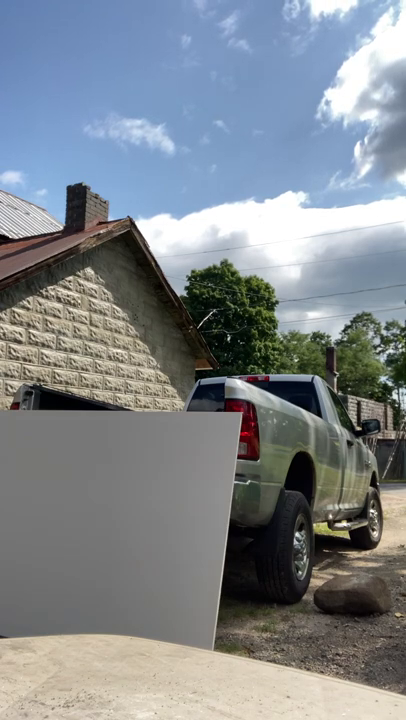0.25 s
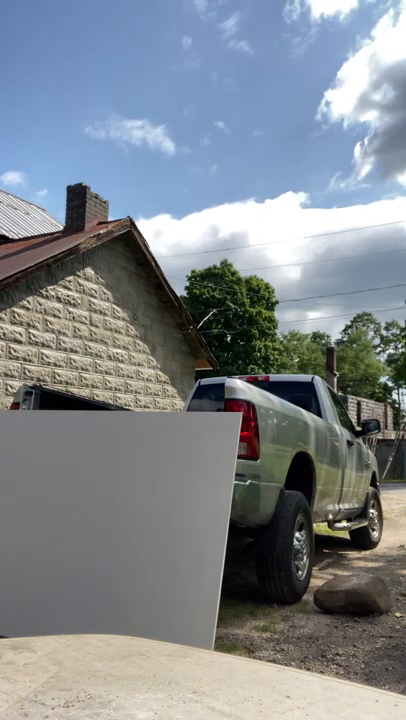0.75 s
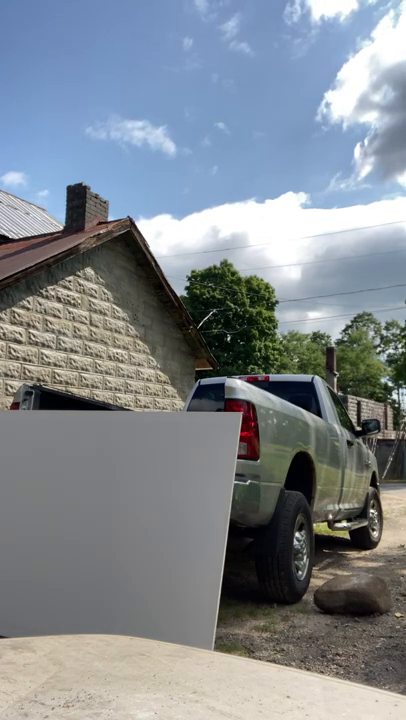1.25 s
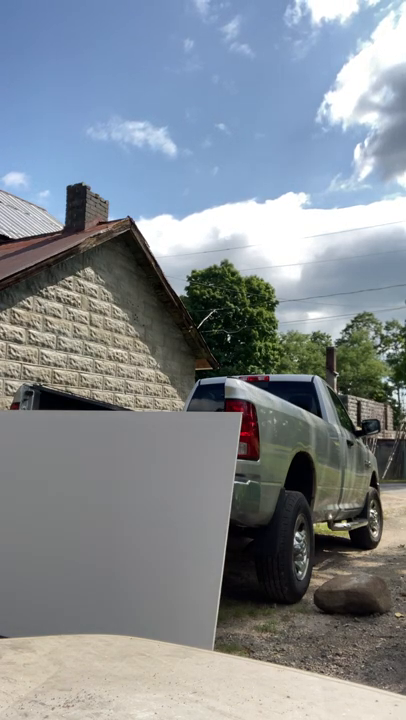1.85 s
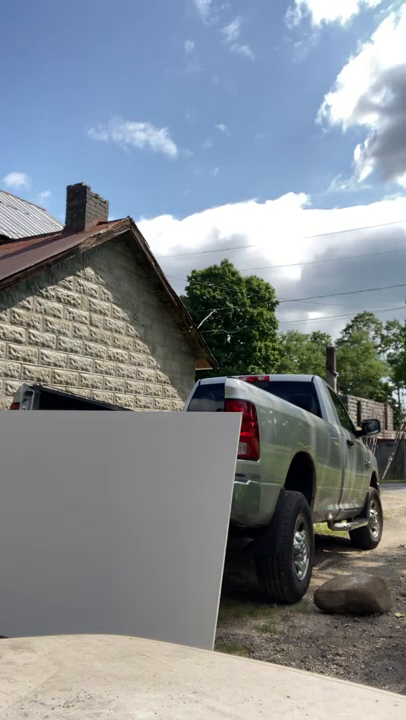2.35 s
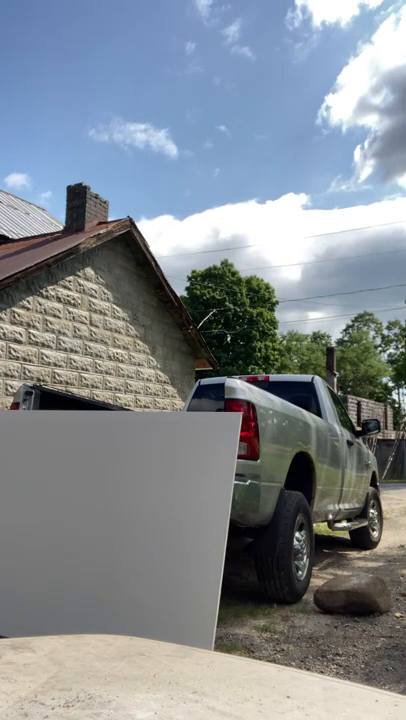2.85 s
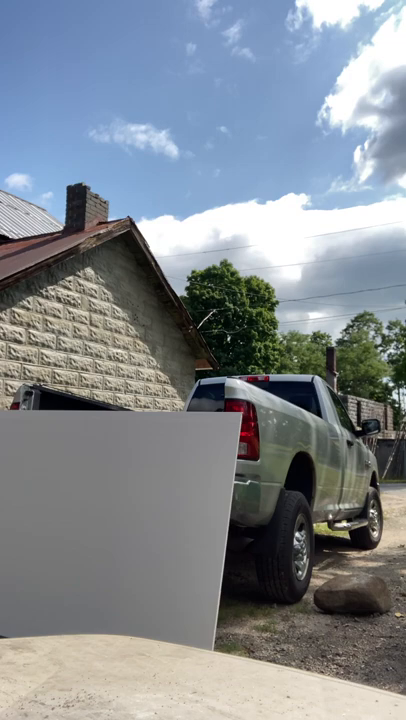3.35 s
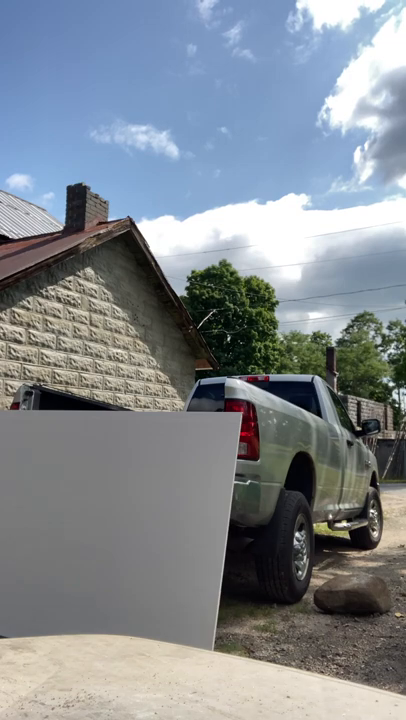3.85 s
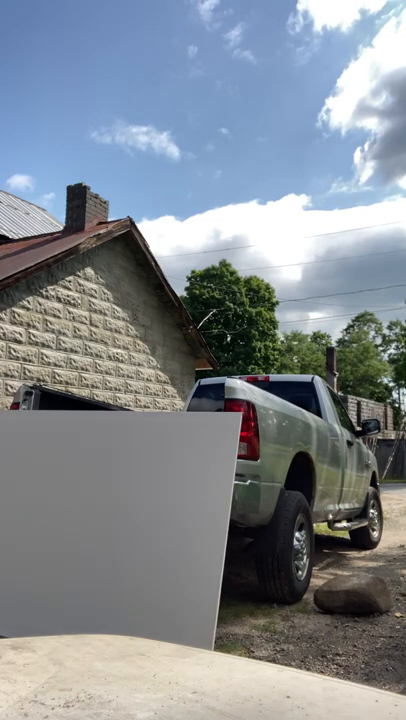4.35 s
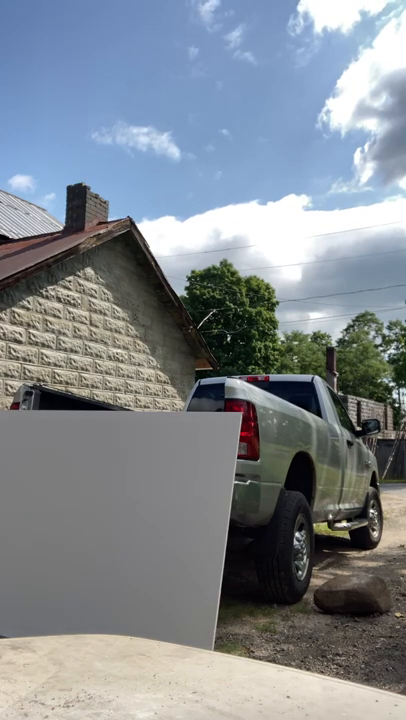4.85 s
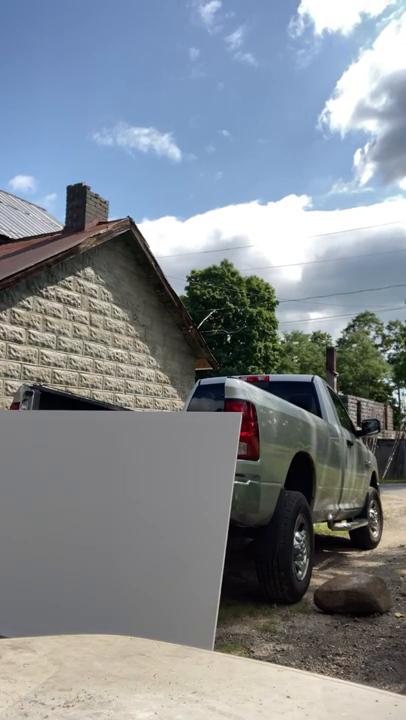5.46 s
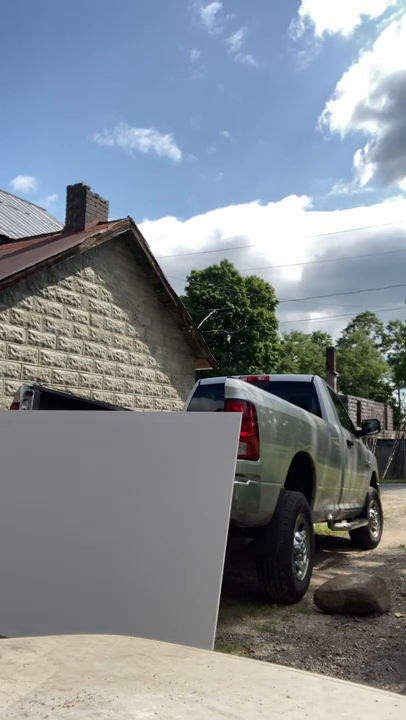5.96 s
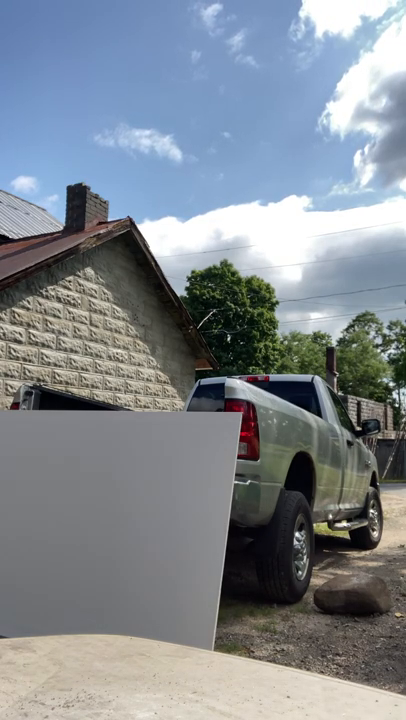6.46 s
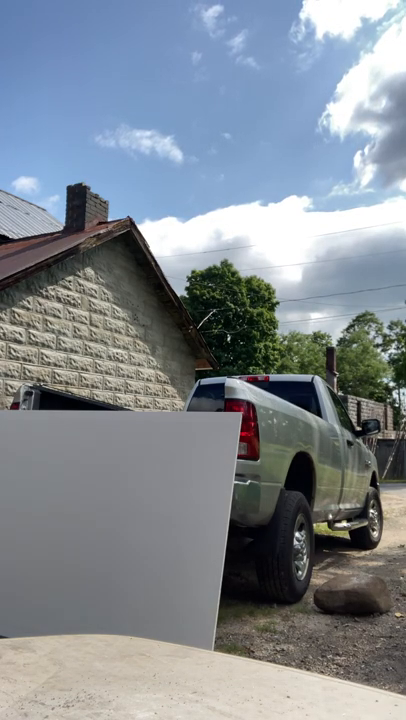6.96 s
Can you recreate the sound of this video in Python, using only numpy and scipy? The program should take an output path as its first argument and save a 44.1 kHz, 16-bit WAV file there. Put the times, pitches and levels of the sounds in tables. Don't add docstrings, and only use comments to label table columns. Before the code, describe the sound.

A steady pair of microphones in a gravel yard hears distant road noise and a soft engine drone coming closer and slowing. The hum beats unevenly, gains rougher harmonics and grows strongest near the end. A cluster of low bumps passes around the middle. Thin cricket chirps, a high insect shimmer, light leaf hiss and small gravel scrapes remain in the background.

```python
import sys
import numpy as np
from scipy import signal
from scipy.fft import rfft, irfft
from scipy.io import wavfile
from scipy.ndimage import uniform_filter1d

SR = 44100
rng = np.random.default_rng(int(sys.argv[2]) if len(sys.argv) > 2 else 0)


def attenuation_scalar(level_db):
    decades = np.asarray(level_db, float) / 20
    return 10 ** decades


def transcribe(signal):
    frames = np.atleast_2d(signal).T
    limited = np.clip(frames, -1, 1)
    pcm = np.round(limited * 32767).astype(np.int16)
    wavfile.write(sys.argv[1], SR, pcm)


N = 317520
T = np.arange(N) / SR

# t/s, f/Hz, level/dB
FIRING = [(0.0, 126, -52.5), (0.45, 125.2, -56.5), (0.6, 125.2, -46), (1.05, 123.7, -45.5),
          (1.5, 123.8, -40), (1.95, 121.7, -41), (2.4, 119.8, -47.5), (2.55, 119, -38.5),
          (3.0, 117.1, -34.5), (3.9, 112.9, -42.5), (4.35, 114.8, -39), (4.95, 110.7, -39.5),
          (5.25, 110.2, -41), (5.4, 109.7, -31), (5.75, 109.7, -29), (6.0, 108.7, -32.5),
          (6.45, 109.3, -37), (6.9, 107.9, -35.5), (7.2, 106.5, -66)]
# t/s, f/Hz
DRIVELINE = [(0, 112.7), (.8, 116.2), (1.5, 111.7), (2.7, 108.8), (3.9, 104.2), (4.8, 103.3), (5.5, 104.1),
             (6.3, 102.2), (7.2, 104.3)]
# t/s, f/Hz, level/dB
THROTTLE = [(6.0, 112.06, -34.0), (6.2, 112.58, -40.4), (6.4, 113.04, -36.4), (6.6, 113.5, -42.3),
            (6.8, 113.87, -40.0), (7.0, 114.16, -36.7), (7.2, 114.45, -38.7)]
# t/s, firing rate/Hz, nearness/dB
APPROACH = [
    (0, 125.8, -22.5),
    (1.2, 123.4, -19),
    (2, 121.7, -13.5),
    (3.5, 114.4, -10.5),
    (4.3, 112.1, -5.5),
    (5.2, 110.8, -2),
    (5.8, 110, -3),
    (6.4, 109.2, 0.5),
    (7.2, 109.8, 1.5),
]
STRONG_ORDERS = (1.515, 2, 17 / 6, 3, 2.5)
# level at nearest/dB, gain per nearness/(dB/dB), slow wander/dB, flutter/dB
ORDER_LAW = [(-42.5, 1.1, 1.2, 2), (-58.5, 0.34, -0.7, 1.7), (-55.5, 0.54, 1.5, 0.7), (-43.5, 2, 1.7, 1.5),
             (-54, 1.5, 0.7, 3)]
# sixths of firing rate/1, level at nearest/dB
WEAK_ORDERS = [(3, -72.5), (4, -71), (5, -63), (10, -58.5), (11, -61.5), (13, -67), (19, -58), (20, -67.5),
               (21, -63), (22, -59.5), (23, -60), (24, -59), (26, -64), (27, -63), (29, -65), (30, -62.5),
               (33, -63.5), (35, -67), (36, -69)]
# t/s, order/1, level change/dB, half-width/s
FADES = [(1.73, 1, -8, 0.11), (2.63, 1, -9, 0.024), (2.8, 1, -5.5, .05), (3.11, 1, -21, 0.074),
         (3.62, 1, -4, 0.057), (4.5, 1, -3, 0.019), (4.2, 1, -5.5, 0.13), (4.8, 1, -16, 0.076),
         (5.55, 1, -11.5, 0.11), (5.46, 1, -2, 0.07), (5.83, 1, -4, 0.032), (2.1, 1.5, -4, 0.17),
         (6.6, 1.5, -3.5, 0.4), (3.72, 1.5, -2, 0.052), (4.4, 1.5, -10, 0.12), (4.8, 1.5, -11, 0.038),
         (5.04, 1.5, -11, 0.049), (5.5, 1.5, -1, 0.069), (5.84, 1.5, -20, 0.085), (4.55, 1.5, -4, .08),
         (6.1, 1.5, -6, 0.12), (6.5, 1.5, -8, 0.19), (6.75, 1.5, -5, 0.087), (7.0, 1.5, -11, 0.14),
         (6.2, 3, -9, 0.039), (2.93, 3, -6, 0.39), (6.43, 3, -5.5, .05), (4.1, 3, -1, 0.06),
         (4.5, 3, -14, 0.083), (4.84, 3, -19, 0.081), (5.4, 3, -5, 0.092), (5.74, 3, -7, 0.11),
         (6.84, 3, -8.5, 0.11), (1.3, 17 / 6, -4, 0.13), (2.24, 2, -16, 0.066), (1.76, 2, 6, 0.42),
         (4.4, 2, -8, 0.35), (7.05, 3, -4.5, 0.12), (5.1, 1.5, 4.5, 0.11), (3.7, 1.5, 4, .15),
         (2.94, 17 / 6, -8, .3), (5.5, 2.5, -4, 0.33), (6.55, 2.5, -15, 0.14), (6.25, 2.5, 8.5, 0.072)]
# f/Hz, level/dB
RUMBLE = [(20, -27), (42, -7), (60, 21), (90, 15), (125, 3), (165, 9.5), (300, -17.5), (1500, -80)]
# f/Hz, level/dB
BODY = [(100, 13), (180, 0), (300, 9.5), (450, 0), (560, -0.5), (800, -24.5), (1500, -72.5)]
# f/Hz, level/dB
TYRES = [(300, -8), (520, -9.5), (640, 3.5), (720, -0.5), (800, -8.5), (1000, -19), (1500, -61)]
# f/Hz, level/dB
FAR_TRAFFIC = [(600, -37), (850, -4), (1080, 0.5), (1300, -4.5), (1500, -10), (2200, -15), (4000, -41.5),
               (9000, -62)]
# t/s, roughness (0 to 1)/1
GROUND = [
    (0, 0.18),
    (2.3, 0.31),
    (2.6, 0.5),
    (2.8, 0.6),
    (3.35, 1),
    (3.7, 0.58),
    (4.35, 0.53),
    (4.5, 0.17),
    (5.2, 0.06),
    (7.2, 0.12),
]
# t/s, level/dB
SCREEN = [(0, -0.5), (.6, -0.5), (2.5, 0.5), (2.8, -4.5), (4.2, 0.5), (4.5, 3.5), (5.3, 1), (5.5, 1),
          (6.85, -1), (7.1, 2.5)]
# t/s, f/Hz, level/dB
TREAD = [(0, 630, -6), (.9, 620, -4.5), (1.7, 605, -3), (2.6, 600, -6), (2.9, 590, -8), (4.2, 599, -17),
         (4.3, 680, -7), (4.6, 674, -3), (5.4, 640, -6.5), (5.6, 565, -9), (6.5, 544.2, -8),
         (6.9, 604, -11), (7.2, 593.6, -2)]
# t/s, level/dB
BREEZE = [
    (0, -72),
    (2.15, -69.5),
    (2.45, -67),
    (3.1, -65),
    (4.2, -63.5),
    (4.9, -65.5),
    (5.4, -67),
    (6.1, -64.5),
    (7.2, -66.5),
]
# f/Hz, level/dB
HISS = [(900, -10), (1500, -1), (3800, -2), (4900, -4), (5600, -9.5), (7500, -12), (9500, -27),
        (12200, -67)]
# f/Hz, level/dB
RUSTLE = [(5000, -19), (7000, -6), (9500, -0.5), (11000, -0.5), (12500, -15), (15000, -24)]
# f/Hz, width/Hz, level/dB
CHORUS = [(8490, 710, -1.8), (8212, 950, -0.7)]
# t/s, level/dB
CHIRPS = [(.0, -67), (0.344, -67), (.69, -66.5), (1.045, -68.5), (1.445, -68), (1.82, -68.5), (2.15, -67.5),
          (2.56, -67.5), (2.98, -79), (3.47, -67), (3.89, -70), (4.451, -66), (4.85, -68), (5.435, -65),
          (5.885, -67), (6.345, -69), (6.77, -65), (6.851, -68)]
# t/s, level/dB
FAR_CHIRPS = [(.022, -68), (.25, -69), (.48, -64.5), (.58, -67), (.72, -70), (.99, -71), (1.187, -69),
              (1.27, -68), (1.411, -68.5), (1.72, -71), (1.85, -71), (2.0, -71), (2.38, -64), (2.68, -68),
              (3.63, -66), (4.699, -68)]
# t/s, length/s, level/dB, ring f/Hz, ring level/dB
SCUFFS = [(0.367, 0.12, -59.5, 1700, -2), (0.386, 0.036, -56, 1650, -4), (0.400, 0.04, -56.5, 2110, 1.5),
          (0.388, .04, -57.5, 2500, -4), (1.484, 0.048, -61, 2720, -9), (2.281, 0.092, -51, 5780, -13),
          (2.314, 0.03, -62, 3500, 9.5), (2.306, .03, -59, 4300, 0), (1.717, .04, -59, 620, 12),
          (0.425, .035, -59, 2000, -3), (2.300, .012, -60, 5940, -4), (2.320, .012, -60, 6400, -4),
          (2.285, 0.032, -62, 3000, 1), (2.2, 0.013, -52, 710, 3), (2.543, 0.086, -57, 2960, -24),
          (4.797, 0.12, -57.5, 4000, -10)]
# f/Hz, level/dB
GRIT = [(800, -3), (1800, 7), (3000, 5.5), (6000, -8), (10000, -19), (12500, -31), (14000, -42),
        (15200, -45)]
# t/s, level/dB, thud f/Hz, ring/s, rattle level/dB
BUMPS = [(2.497, -33.5, 60.3, 0.4, -17), (3.147, -39, 89, 0.48, -0.5), (3.165, -30.5, 133, 0.21, -7.5),
         (3.22, -29, 130, 0.13, -24), (3.251, -31, 90, 0.2, -22), (3.315, -38, 130, 0.067, -4),
         (3.366, -17, 119, 0.085, -38), (3.422, -41.5, 97.7, 0.14, 0.5), (3.422, -40, 450, .05, -8),
         (3.424, -42, 190, .04, -20), (2.49, -36.5, 180, .07, -12), (3.16, -41, 370, .09, -10),
         (3.325, -44, 240, .06, -6), (3.945, -41, 128, 0.33, 2.5), (3.975, -40.5, 89, 0.32, -3),
         (3.95, -41, 320, .12, -8), (4.095, -39, 75, .2, -14), (7.0, -51, 90, 0.22, 4),
         (7.08, -49, 95, .2, 5)]
# f/Hz, likeness/1
COHERENCE = [(50, -.3), (110, 0.91), (300, 0.9), (640, 0.39), (1400, 0.38), (5500, 0.38), (7000, 0.7),
             (7600, 1)]
# f/Hz, level difference/dB
LEAN = [(50, -1), (110, 0.5), (180, 4), (330, 1.5), (700, 1.5), (1300, -0.1), (2400, -1), (7000, 0)]
# f/Hz, lead/rad
LEAD = [(20, 0.5), (430, 0.0), (860, 3.5), (1380, 4), (2330, 3.5), (3900, 5.5), (5000, 3), (6800, 6.5)]
# f/Hz, level/dB
SELF_NOISE = [(9000, -38.5), (11000, -11), (11800, -4), (14500, -14), (15100, -11)]


def evened(x):
    return x / np.sqrt(np.mean(x ** 2) + 1e-20)


def read(points, hz):
    f, value = np.transpose(points)
    return np.interp(np.log(hz + 1), np.log(f + 1), value)


def curves(rows):
    s, *columns = np.transpose(rows)
    return [np.interp(T, s, c) for c in columns]


def drift(per_s):
    t = T[::256]
    rates = np.geomspace(per_s / 12, per_s, 16)
    slow = sum(np.sin(2 * np.pi * (f * t + rng.random())) / np.sqrt(f) for f in rates)
    return np.interp(T, t, evened(slow))


def resonate(x, hz, width):
    turn = np.exp(2j * np.pi * np.cumsum(hz * np.ones(x.shape[-1])) / SR)
    r = np.exp(-np.pi * width / SR)
    return 2 * (turn * signal.lfilter([1 - r], [1, -r], x / turn)).real


def noise(spectrum, patchy_db):
    frames, hz = N // 256 + 5, np.fft.rfftfreq(1024, 1 / SR)
    a, b, c, d, patches = rng.standard_normal((frames, 513, 5)).T
    patches = uniform_filter1d(patches, size=10, axis=0)
    patches = evened(uniform_filter1d(patches, size=16, axis=1))
    same = np.clip(read(COHERENCE, hz), -1, 1)[:, None]
    left, apart = a + 1j * b, c + 1j * d
    right = same * left * np.exp(-1j * read(LEAD, hz))[:, None] + np.sqrt(1 - same ** 2) * apart
    z = np.array([left, right]) * attenuation_scalar(read(spectrum, hz)[:, None] + patchy_db * patches)
    z = z * attenuation_scalar(np.array([[.5], [-.5]]) * read(LEAN, hz))[..., None]
    return evened(signal.istft(z, nperseg=1024, noverlap=768)[1][:, :N])


def tone(turns, hz, db, fading_db, wobble):
    port = np.array([[.5], [-.5]])
    phase = 2 * np.pi * turns + wobble * drift(6.0) - port * hz / 900 * (1.18 + drift(1.554))
    level = attenuation_scalar(db + port * read(LEAN, hz) + fading_db * drift(11.0))
    return np.sqrt(2) * level * np.cos(phase)


def fading(order):
    return sum(db * np.exp(-((T - s) / width) ** 2) for s, k, db, width in FADES if abs(k - order) < .1)


def drone():
    driveline_null_s, throttle_null_s = 4.438, 6.175
    firing_hz, firing_db = curves(FIRING)
    throttle_hz, throttle_db = curves(THROTTLE)
    firing = np.cumsum(firing_hz) / SR
    hum = np.cumsum(curves(DRIVELINE)[0]) / SR
    throttle = np.cumsum(throttle_hz) / SR
    hum = hum + (firing - hum)[round(driveline_null_s * SR)] + .5
    throttle = throttle + (firing - throttle)[round(throttle_null_s * SR)] + .5
    opened = np.clip(1 + (T - THROTTLE[0][0]) / 0.12, 0, 1)
    hum_db = -47.5 + 0.49 * curves(APPROACH)[1]
    out = tone(firing, 112, firing_db + fading(1), .5, .1)
    out = out + tone(hum, 112, hum_db, 1.5, .1)
    return out + opened * tone(throttle, 112, throttle_db, .5, .1)


def engine():
    hz, near_db = curves(APPROACH)
    turns = np.cumsum(hz) / SR
    out = np.zeros((2, N))
    for k, (db, gain, wander_db, flutter_db) in zip(STRONG_ORDERS, ORDER_LAW):
        level_db = db + gain * near_db + fading(k) + wander_db * drift(4.0)
        out += tone(k * turns, k * 112, level_db, flutter_db, 0.3)
    for k, db in WEAK_ORDERS:
        out += tone(round(k) / 6 * turns, k * 19, db + 1.11 * near_db, 4.5, 2.05)
    fan_gear = 1.225
    return out + tone(fan_gear * turns, 140, -51.5 + 0.19 * near_db, 2.6, 0.75)


def road():
    near_db, rough, screen_db = curves(APPROACH)[1], curves(GROUND)[0], curves(SCREEN)[0]
    tread_hz, tread_db = curves(TREAD)
    singing = evened(resonate(noise(TYRES, 0.84), tread_hz + 10 * drift(5.0), 30))
    tread = attenuation_scalar(tread_db + 1.9 * drift(12.0)) * singing
    rumble = attenuation_scalar(-60.5 + 20 * rough + 1.5 * drift(3.05)) * noise(RUMBLE, 2.0)
    tyres_db = -52.5 + 0.06 * near_db + screen_db + .6 * drift(10)
    tyres = attenuation_scalar(tyres_db) * (noise(TYRES, 1.3) + tread)
    far = attenuation_scalar(-56.5 + 0.35 * screen_db + .3 * drift(10)) * noise(FAR_TRAFFIC, 1.67)
    body = attenuation_scalar(-49 + 0.59 * near_db + 1.5 * drift(6.0)) * noise(BODY, 2.4)
    return rumble + body + tyres + far


def leaves():
    breeze_db = curves(BREEZE)[0]
    tips_db = -74.5 + 2.6 * (breeze_db - breeze_db.max()) + 1.5 * drift(8.0)
    hiss = attenuation_scalar(breeze_db + 6.0 + 0.047 * drift(12.0)) * noise(HISS, 2.1)
    return hiss + attenuation_scalar(tips_db) * noise(RUSTLE, 1.9)


def chorus():
    throb = 1 + 0.24 * np.sin(2 * np.pi * np.cumsum(18.0 + 0.55 * drift(1.5)) / SR)
    clicks_per_s = 12000 * throb
    clicks = rng.standard_normal(N) * (rng.random(N) < clicks_per_s / SR)
    wings = np.zeros(N)
    for hz, width, db in CHORUS:
        wings += attenuation_scalar(db) * resonate(resonate(resonate(clicks, hz, width), hz, width), hz, width)
    nearest_hz, width_hz = 8483, 30
    soloist = evened(resonate(resonate(clicks, nearest_hz, width_hz), nearest_hz, width_hz))
    return attenuation_scalar(-65 + .5 * drift(3.0)) * (evened(wings) + attenuation_scalar(-16.5) * soloist)


def cricket():
    out, scrape = np.zeros(N + SR), rng.standard_normal(N)
    calls = [(s, 0.098, db, 4620) for s, db in CHIRPS]
    calls += [(s, 0.09, db - 3.5, 4840) for s, db in FAR_CHIRPS]
    trill_hz = 4760
    trill = resonate(resonate(scrape[::-1], trill_hz + 120 * drift(5.0), 260), trill_hz, 500)
    out[:N] += attenuation_scalar(-79 + 3 * drift(14.0)) * evened(trill)
    for (s, length, db, hz), stray in zip(calls, rng.standard_normal(len(calls))):
        at, t = round(s * SR), np.arange(round(length * SR)) / SR
        hz = hz + 35 * (stray + 1 - 2 * t / length)
        wing = evened(resonate(resonate(scrape[at:at + len(t)], hz, 250), hz, 250))
        strokes = .3 + .7 * np.sin(np.pi * 40 * t) ** 2
        out[at:at + len(t)] += attenuation_scalar(db + 2.5) * strokes * signal.windows.tukey(len(t), .5) * wing
    echoes = rng.standard_normal((2, 1800)) * attenuation_scalar(-60 * np.arange(1800) / SR / .065)
    echoes = echoes / np.linalg.norm(echoes[0])
    return .45 * out[:N] + .7 * signal.fftconvolve(out[None], echoes, axes=1)[:, :N]


def scuffs():
    grit, out = noise(GRIT, 0.6), np.zeros((2, N))
    catching = evened(uniform_filter1d(rng.standard_normal(N), size=90))
    grains = evened(attenuation_scalar(2.5 * catching))
    for s, length, db, hz, ring_db in SCUFFS:
        at, size = round(s * SR), round(length * SR)
        rub = grit[:, at:at + size]
        ring = attenuation_scalar(ring_db) * evened(resonate(resonate(rub, hz, 260), hz, 260))
        octaves = np.log2(np.fft.rfftfreq(size, 1 / SR) / 3000 + .01)
        tilt_db = 246 * (length - 0.078) * octaves
        rub = evened(irfft(rfft(rub) * attenuation_scalar(tilt_db), size))
        stroke = np.sin(np.pi * np.linspace(0, 1, size) ** .72) ** 2
        out[:, at:at + size] += attenuation_scalar(db) * (rub + ring) * stroke * grains[at:at + size]
    return out


def bumps():
    out, t = np.zeros(N + SR), np.arange(SR // 2) / SR
    shake = rng.standard_normal((len(BUMPS), len(t)))
    onset = 1 - np.exp(-t / 0.0067)
    for (s, db, hz, ring, rattle_db), row in zip(BUMPS, shake):
        rattle = evened(resonate(resonate(row, 280, 250), 280, 250))
        rattle = rattle * attenuation_scalar(rattle_db + 1.5 - 60 * t / 0.14)
        thud = np.sin(2 * np.pi * hz * t) * attenuation_scalar(-60 * t / ring)
        out[round(s * SR):][:len(t)] += attenuation_scalar(db) * (thud + rattle) * onset
    return out[:N] * attenuation_scalar(np.array([[.8], [-.8]]))


def scene():
    return drone() + engine() + road() + leaves() + chorus() + cricket() + scuffs() + bumps()


def top_cut(x):
    return signal.sosfilt(signal.butter(12, 15610, fs=SR, output="sos"), x)


def record(dry):
    bass_cut_hz, top_edge_hz = 43, 15130
    heard = dry + attenuation_scalar(-86) * noise(SELF_NOISE, .3)
    heard = heard * np.clip((N - np.arange(N)) / 200, 0, 1)
    bass_cut = signal.butter(3, bass_cut_hz, "high", fs=SR, output="sos")
    heard = signal.sosfilt(bass_cut, heard)
    heard = signal.oaconvolve(heard, signal.firwin(511, top_edge_hz, fs=SR)[None], "same")
    return top_cut(heard)


dry = scene()
out = record(dry)
transcribe(out)
```